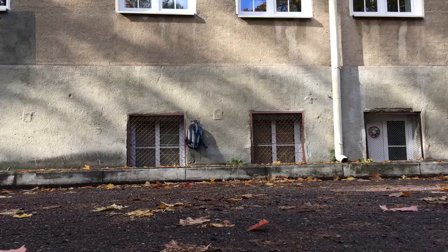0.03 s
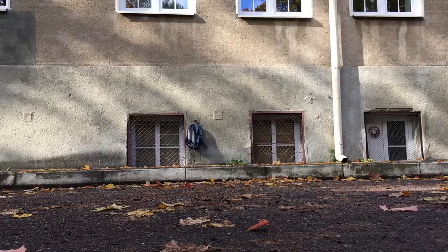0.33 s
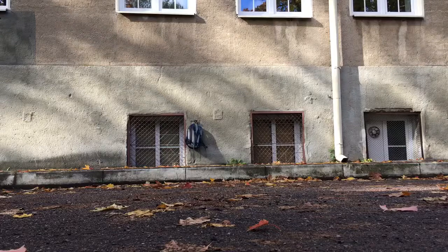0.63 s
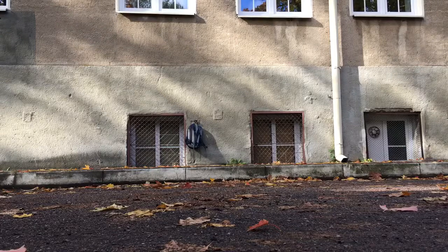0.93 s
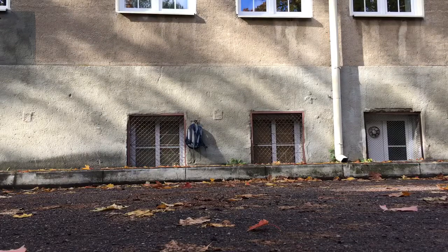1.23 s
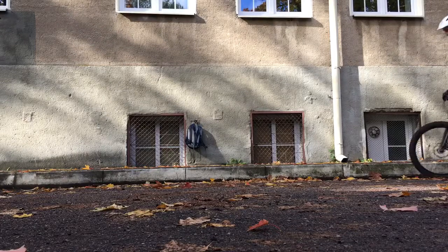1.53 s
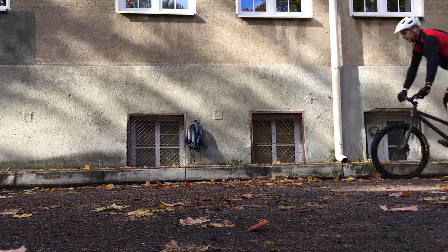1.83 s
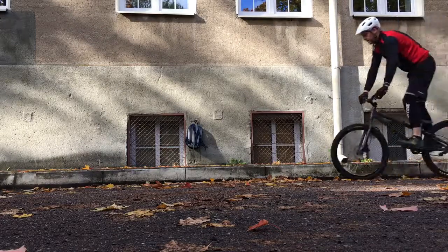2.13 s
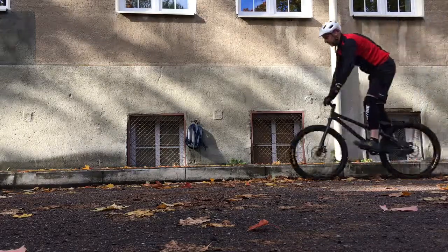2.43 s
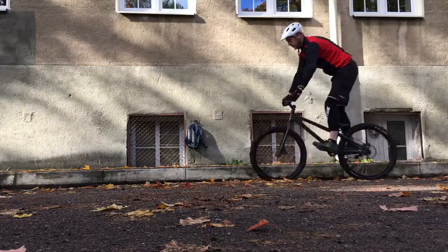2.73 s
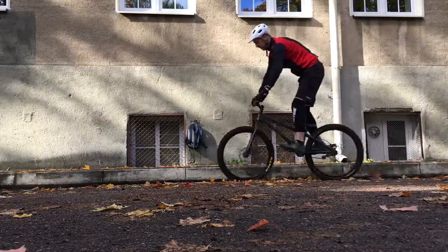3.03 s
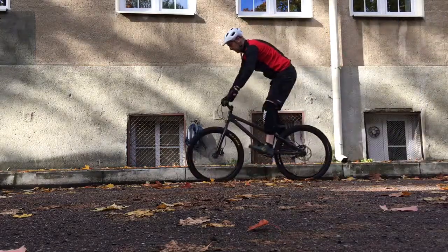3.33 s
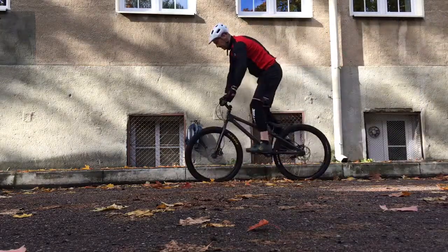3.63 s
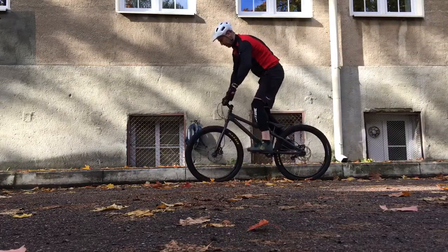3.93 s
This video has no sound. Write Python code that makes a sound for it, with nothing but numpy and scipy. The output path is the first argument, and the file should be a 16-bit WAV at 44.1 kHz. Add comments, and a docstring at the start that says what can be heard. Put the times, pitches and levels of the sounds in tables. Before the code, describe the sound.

Rapid freewheel ticking from a slowly rolling bike, ending in two high brake squeals and knocks.

```python
"""A yard beside a house wall, one microphone on the ground, the town rumbling far off.
A trials bike coasts slowly closer, its freewheel pawls ticking 35-65 times a second and rattling
hub and spokes. Close by, the tyres roll softly and the disc brake squeals twice near 10-12 kHz as
the pads drive the rotor; the walls throw the sound back. The bike stops, and frame and held brake
knock, creak and ring as the rider balances."""
import sys
import numpy as np
from scipy import signal
from scipy.fft import rfft, irfft
from scipy.io import wavfile

SR = 44100
rng = np.random.default_rng(int(sys.argv[2]) if len(sys.argv) > 2 else 0)


def inscribe(sig):
    """Save sig as 16-bit PCM at rate SR to the path in sys.argv[1].

    A 1-D sig is mono; a 2-D sig holds one channel per row.
    Samples are clipped to [-1, 1] before scaling.
    """
    pcm = np.round(np.clip(np.atleast_2d(sig).T, -1, 1) * 32767)
    wavfile.write(sys.argv[1], SR, pcm.astype(np.int16))


N = 176400
TIME = np.arange(N) / SR
YARD_T60_S = 0.49


def from_db(db):
    """Decibels to gain."""
    return 10 ** (np.asarray(db) / 20)


def rms_one(x):
    """Scale to unit rms."""
    return x / np.sqrt(np.mean(x ** 2) + 1e-20)


def noise(db_at):
    """Unit noise whose level per Hz is a function of frequency."""
    hz = np.maximum(np.arange(N // 2 + 1) * SR / N, 1)
    return rms_one(irfft(rfft(rng.standard_normal(N)) * from_db(db_at(hz)), N))


def coloured(points):
    """Unit noise with a spectrum of (Hz, dB) points."""
    hz, db = np.transpose(points)
    return noise(lambda f: np.interp(np.log(f), np.log(hz), db))


def drift(rate_hz):
    """Random wander of spread 1, up to about the given rate."""
    return noise(lambda f: -20 * np.log10(1 + (f / rate_hz) ** 2))


def hump(hz, octaves):
    """Unit noise in one broad resonance."""
    return noise(lambda f: -20 * np.log10(1 + (np.log2(f / hz) / octaves) ** 2))


def swell(s, half_length):
    """A bell-shaped rise and fall around one moment."""
    return np.exp(-((TIME - s) / half_length) ** 2)


def resonance(x, hz, width_hz):
    """Two-pole resonance with gain 1 at its peak."""
    r = np.exp(-np.pi * width_hz / SR)
    feedback = [1, -2 * r * np.cos(2 * np.pi * hz / SR), r * r]
    return signal.lfilter(np.array([1, 0, -1]) * (1 - r * r) / 2, feedback, x)


def yard(x, t60):
    """Diffuse reflections from the house walls, at unit energy."""
    wall_delay_s, build_s = 0.015, 0.011
    t = TIME[:SR]
    build = 1 - np.exp(-np.maximum(t - wall_delay_s, 0) / build_s)
    tail = rng.standard_normal(SR) * build * np.exp(-np.log(1000) * t / t60)
    return signal.fftconvolve(x, tail / np.sqrt(np.sum(tail ** 2)))[:N]


def town():
    """Far traffic rumble, swaying slightly, with a few deep swells."""
    # Each row: frequency in Hz, relative level per Hz in dB.
    spectrum = [(22, -47), (31, -26), (41, -3), (62, 3), (100, -5), (190, -11.5), (280, -19), (450, -25.5),
                (700, -25.5), (1100, -26), (1700, -33), (3000, -36), (5000, -46.5), (9000, -45.5),
                (16000, -51)]
    # Each row: peak time in seconds, level in dB, half-length in seconds.
    deep_swells = [(0.532, -37.5, .02), (0.616, -45, 0.06), (1.193, -40.5, 0.017), (2.17, -42.5, 0.035)]
    rumble = coloured(spectrum) * from_db(-44 + .5 * drift(7.1))
    swells = sum(from_db(db) * swell(s, half_length) for s, db, half_length in deep_swells)
    return rumble + swells * hump(hz=71, octaves=0.26)


def tyres():
    """A soft low roll on leaves that swells as the bike comes in front of the microphone."""
    nearest_s, pass_s = 3.43, 0.21
    relative_distance = np.sqrt(1 + ((TIME - nearest_s) / pass_s) ** 2)
    return from_db(-61) * hump(hz=343, octaves=0.34) / relative_distance


def frame_ring():
    """The bike jerks against the held brake, striking each mode of frame and rotor unevenly."""
    # Each row: start in seconds, strength of the jerk in dB.
    jerks = [(3.7424, -2), (3.7505, -4.5), (3.760, 0)]
    # Each row: pitch in Hz, level in dB for a 0 dB jerk, seconds to fall by 60 dB.
    modes = [(588, -66.5, 1.7), (897, -63, 2.0), (1071, -67, 1.1), (1230, -64, 1.9), (1584, -55, 0.29),
             (2090, -54, 0.38), (2260, -46.5, 0.067), (2496, -57, .12), (3860, -56, 0.15),
             (7050, -53, 0.054), (7400, -54, 0.056), (9800, -55, .05), (12400, -55, .05)]
    scatter_db = 2.5
    out = np.zeros(N)
    for s, strength_db in jerks:
        age = np.maximum(TIME - s, 0)
        for hz, db, t60 in modes:
            gain = from_db(strength_db + db + scatter_db * rng.standard_normal()) * (TIME > s)
            decay = np.exp(-np.log(1000) * age / t60)
            out += gain * decay * np.sin(2 * np.pi * (hz * age + rng.random()))
    return out


def click_and_knocks():
    """A sharp click near 3 kHz as the sound begins; later, damped knocks and creaks of frame and brake."""
    # Each row: start in seconds, level in dB, centre in Hz, width in octaves, decay in seconds.
    bursts = [(0.072, -29, 3100, 0.42, 0.0024), (1.725, -49, 3000, 0.47, 0.019),
              (1.75, -47.5, 2100, 0.38, .02), (1.763, -51.5, 920, 0.25, 0.058),
              (3.016, -48.5, 1850, 0.2, 0.011), (3.022, -48.5, 3900, 0.14, 0.0099),
              (3.024, -44, 10300, 0.038, 0.013), (3.098, -47.5, 3510, 0.2, 0.018),
              (3.429, -45, 12100, .012, .012), (3.444, -53, 5070, .08, 0.0088),
              (3.479, -45, 4550, 0.89, .003), (3.548, -48.5, 2580, 0.82, 0.014),
              (3.560, -47, 2050, 0.71, 0.0046), (3.567, -41, 2230, 0.48, 0.0056),
              (3.573, -40.5, 2740, 0.5, 0.0071), (3.584, -51, 2900, 0.12, 0.026),
              (3.618, -56, 12000, .7, .005), (3.729, -64, 3950, 1.6, 0.0049),
              (3.7425, -39, 2090, 0.64, 0.0048), (3.7514, -43, 2240, 0.88, 0.0059),
              (3.753, -47.5, 11000, 1, .014), (3.760, -38, 1950, 0.73, 0.0093),
              (3.775, -50.5, 2500, 0.55, 0.012), (3.905, -53.5, 10900, 1.1, 0.013),
              (3.922, -58, 3000, 1.0, 0.024), (3.946, -52, 3480, 0.38, .004)]
    attack_s = 0.00026
    out = np.zeros(N)
    for s, db, hz, octaves, decay in bursts:
        age = np.maximum(TIME - s, 0)
        envelope = np.minimum(age / attack_s, 1) * np.exp(-age / decay)
        out += from_db(db) * envelope * hump(hz, octaves)
    return out + from_db(-23.5) * yard(out, YARD_T60_S)


def squeal(curve, rub_db):
    """The pad rubs the rotor: a nearly pure tone with a thin skirt of rubbing noise."""
    jitter_hz, rub_width_hz = 4.5, 240
    s, hz, db = np.transpose(curve)
    level = from_db(np.interp(TIME, s, db)) * (TIME > s[0]) * (TIME < s[-1])
    pitch = np.interp(TIME, s, hz) + jitter_hz * drift(140)
    phase = 2 * np.pi * np.cumsum(pitch) / SR
    rub = drift(rub_width_hz) * np.sin(phase) + drift(rub_width_hz) * np.cos(phase)
    return level * (np.sqrt(2) * np.sin(phase) + from_db(rub_db) * rub)


def brake():
    """Two pulls of the lever; the second slides up and jumps to a higher whistle as the wheel stops."""
    # One table per squeal; the level of the first flutters as two close pitches beat.
    # Each row: time in seconds, pitch in Hz, level in dB.
    first_squeal = [(2.949, 10100, -60), (2.954, 10090, -28), (2.957, 10085, -18.5), (2.964, 10090, -25),
                    (2.970, 10100, -24), (2.978, 10130, -45), (2.982, 10130, -27), (2.987, 10131, -21.5),
                    (2.9925, 10170, -40), (2.997, 10195, -26), (3.004, 10190, -28), (3.009, 10150, -39),
                    (3.024, 10110, -28), (3.031, 10085, -17), (3.040, 10087, -25), (3.046, 10090, -37),
                    (3.06, 10090, -42)]
    rising_squeal = [(3.403, 11170, -62), (3.414, 11250, -44), (3.428, 11480, -36), (3.442, 11760, -33),
                     (3.457, 11930, -23.5), (3.468, 12060, -35), (3.482, 12100, -55)]
    last_whistle = [(3.472, 12370, -60), (3.484, 12383, -42), (3.497, 12383, -39), (3.513, 12383, -40),
                    (3.525, 12380, -62)]
    first = squeal(first_squeal, rub_db=-21)
    second = squeal(rising_squeal, rub_db=-11) + squeal(last_whistle, rub_db=-35)
    reflected = yard(first, YARD_T60_S) + yard(second, t60=0.32)  # air shortens the highest squeals
    return first + second + from_db(-11) * reflected


def pawls():
    """Two pawl sets drop off the ratchet in turn; gives the grainy envelope of their ticks."""
    # Each row: time in seconds, ticks per second.
    tick_rate = [(0.07, 64.85), (0.42, 65.94), (0.66, 53.55), (0.75, 52.32), (1.29, 59.34), (1.65, 57.89),
                 (1.76, 46.7), (2.08, 54.94), (2.25, 51.55), (2.47, 57.88), (2.7, 57.23), (2.92, 51.27),
                 (3.09, 34.12), (3.18, 43.1), (3.36, 44.86), (3.41, 37.88), (3.48, 19.5)]
    # The bike nears and slows. Each row: time in seconds, relative tick level in dB.
    tick_level = [(.1, -.2), (1.2, -.7), (1.9, 0), (2.3, .7), (2.7, .7), (3.05, .2), (3.35, 1.8),
                  (3.42, .8), (3.47, -2)]
    start_tooth, stop_s = -.37, 3.485
    base_db, weak_set_db, scatter_db, grain_db = -43.5, -1.0, 0.5, 3.0
    attack_s, hold_s, decay_s = .0005, .0038, .0026
    teeth = np.floor(np.cumsum(np.interp(TIME, *np.transpose(tick_rate))) / SR + start_tooth)
    drops = np.flatnonzero((np.diff(teeth) > 0) & (TIME[1:] < stop_s)) + 1
    weak = teeth[drops] % 2 == 0
    drop_db = base_db + np.interp(TIME[drops], *np.transpose(tick_level)) + weak_set_db * weak
    clicks = np.zeros(N)
    clicks[drops] = from_db(drop_db + scatter_db * rng.standard_normal(len(drops)))
    t = TIME[:SR // 20]
    shape = np.minimum(t / attack_s, 1) * np.exp(-np.maximum(t - hold_s, 0) / decay_s)
    return signal.fftconvolve(clicks, shape)[:N] * rms_one(from_db(grain_db * drift(800)))


def freewheel():
    """Each tick rattles hub and spokes; their modes ring on, swelling and fading as the wheel turns."""
    # The rattle. Each row: frequency in Hz, relative level per Hz in dB.
    spectrum = [(500, -25), (950, -3), (1400, -4.5), (1900, -2), (2250, -5), (2700, 1), (3300, -1.5),
                (4200, 1.5), (4950, -1), (5700, 0.5), (6800, -3.5), (7600, -8.5), (9400, -4), (10400, -6),
                (12000, -1.5), (14000, 0), (16000, 0.5)]
    # Each row: pitch in Hz, width in Hz, gain in dB, peak time and half-length in seconds.
    modes = [(1950, 350, 1.5, 3.15, .4), (2630, 180, 0, 0.55, 1.6), (4080, 170, 0, 1.7, 1.5),
             (5400, 210, 6.5, 1.02, 0.35), (5630, 600, 3, 2.35, 0.32), (9550, 82, 8, 1.3, 0.34),
             (10900, 110, 10, 2.3, 0.4), (14300, 610, -3, 2.9, .8), (14700, 230, 5, 2.2, 2.8)]
    envelope = pawls()
    drive = envelope * coloured(spectrum)
    rings = sum(from_db(db) * resonance(drive * swell(s, half_length), hz, width)
                for hz, width, db, s, half_length in modes)
    return envelope * coloured(spectrum) + rings


def approach(ticks):
    """Far from the microphone the ticks are duller, and more of them comes off the walls."""
    near_s, far_treble_db, near_yard_db, far_yard_boost_db = 2.8, -5, -4, 4
    far = np.clip(1 - TIME / near_s, 0, 1)
    treble = signal.sosfiltfilt(signal.butter(2, 5250, "high", fs=SR, output="sos"), ticks)
    direct = ticks + treble * (from_db(far_treble_db * far) - 1)
    reflected = signal.sosfilt(signal.butter(1, 9300, fs=SR, output="sos"), yard(direct, t60=0.56))
    return direct + from_db(near_yard_db + far_yard_boost_db * far) * reflected


def scene():
    """Bike and surroundings at one microphone on the ground."""
    return (approach(freewheel()) + brake() + click_and_knocks() + frame_ring() + tyres() + town())[None]


def record(dry):
    """The sound opens after a moment of silence; the highest treble is cut."""
    start_s, cutoff_hz = .0725, 15850
    lowpass = signal.ellip(10, .1, 80, cutoff_hz, fs=SR, output="sos")
    return signal.sosfilt(lowpass, dry * (TIME > start_s))


dry = scene()
out = record(dry)
inscribe(out)
```